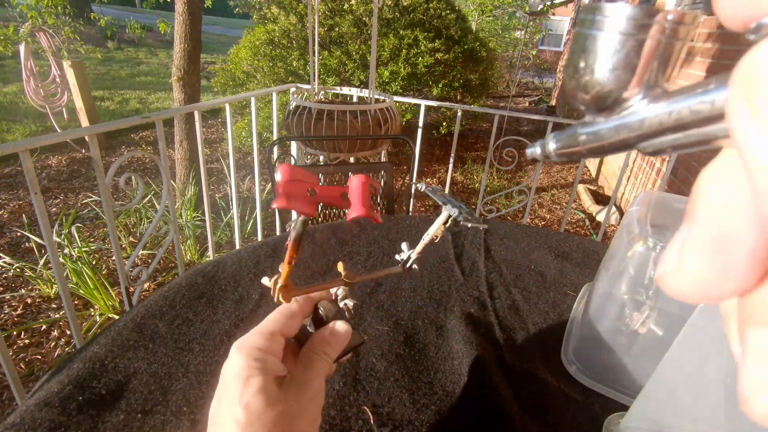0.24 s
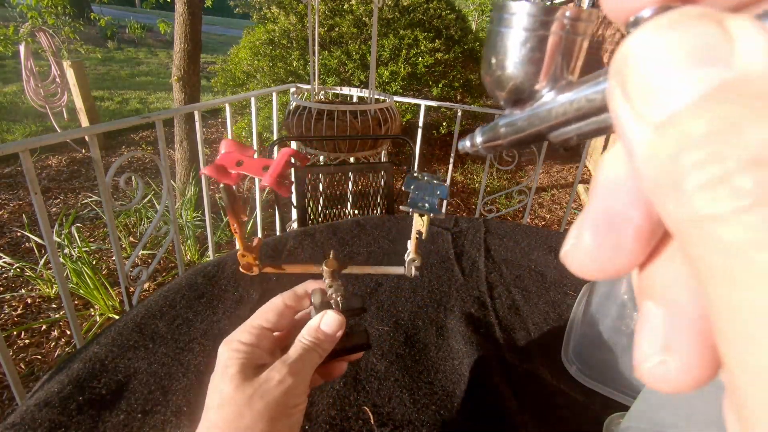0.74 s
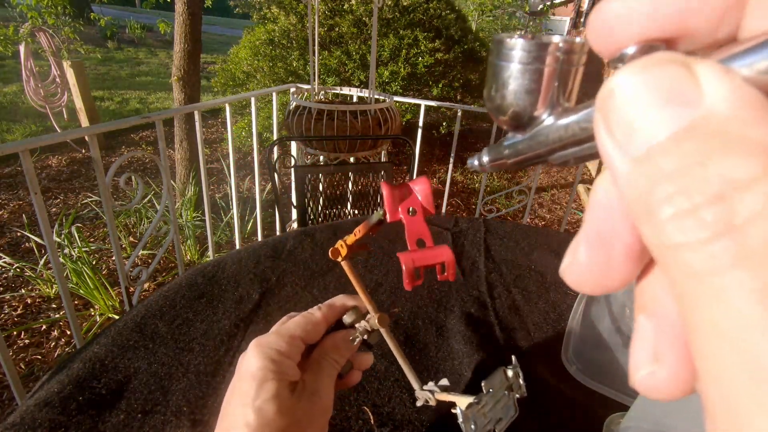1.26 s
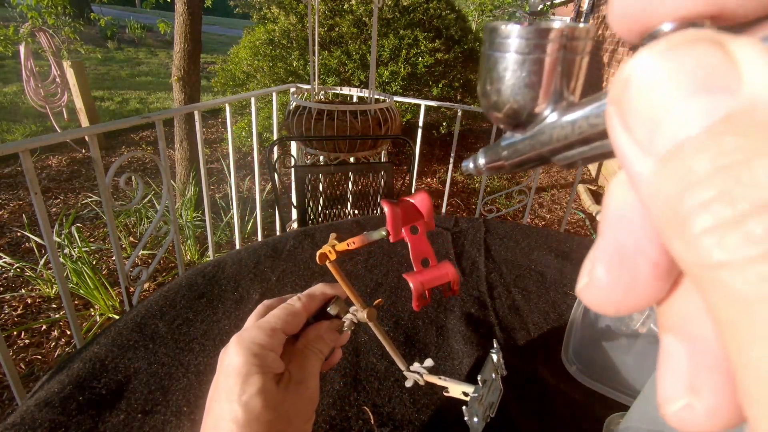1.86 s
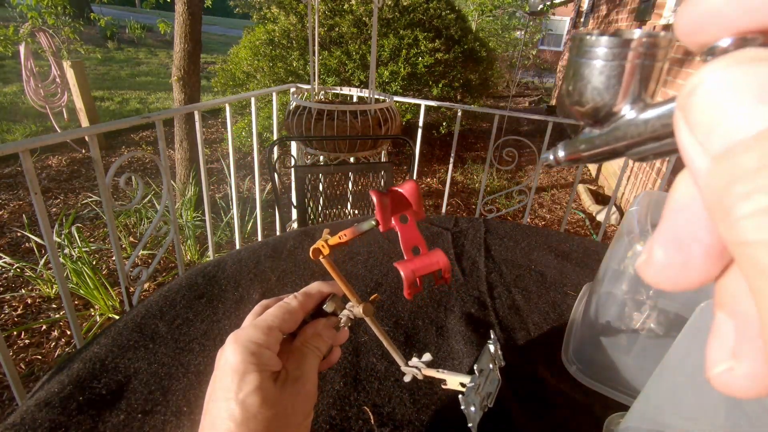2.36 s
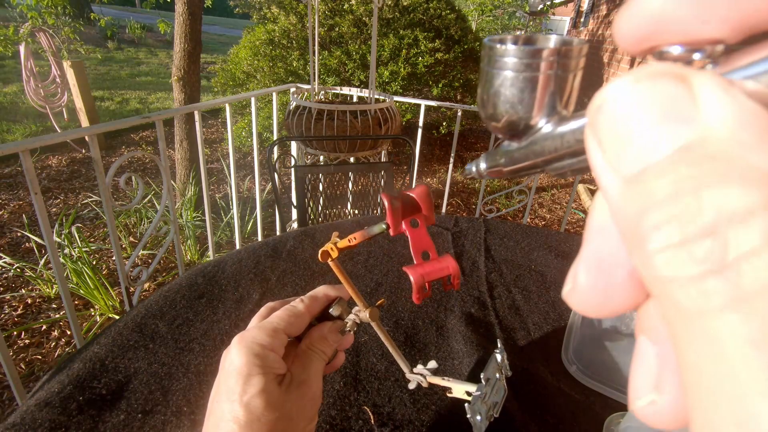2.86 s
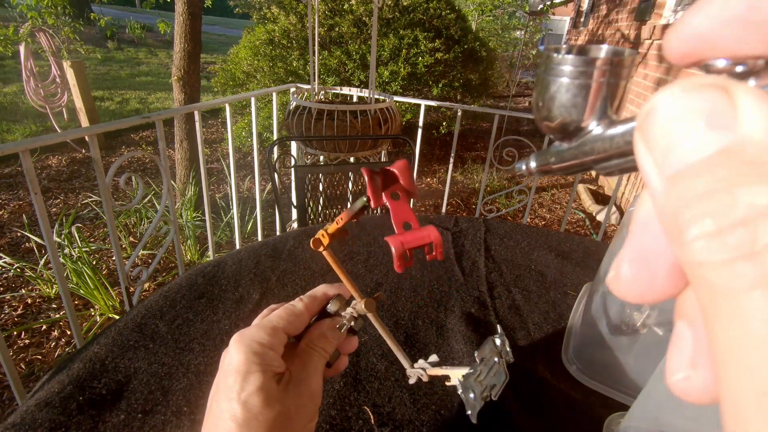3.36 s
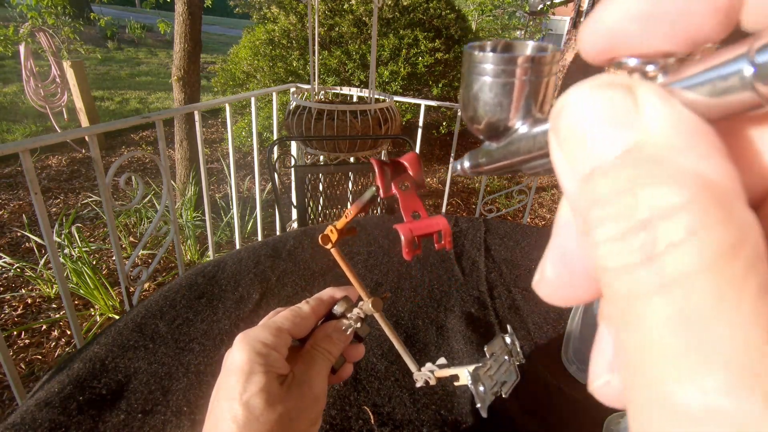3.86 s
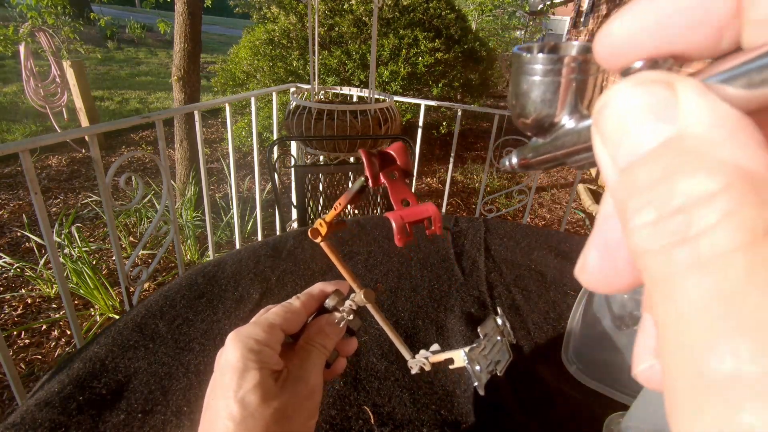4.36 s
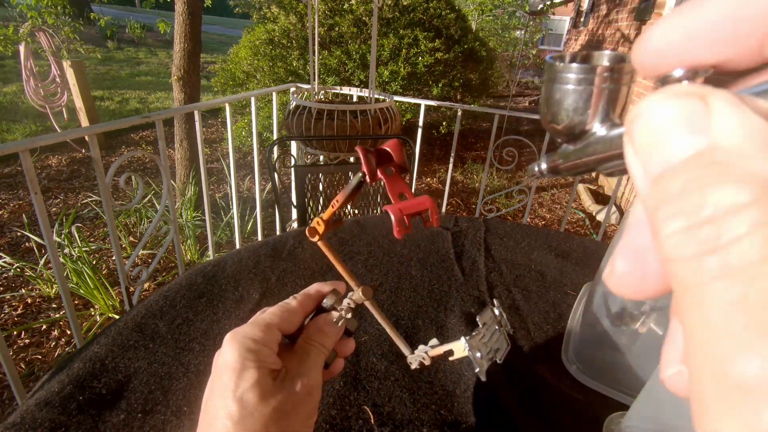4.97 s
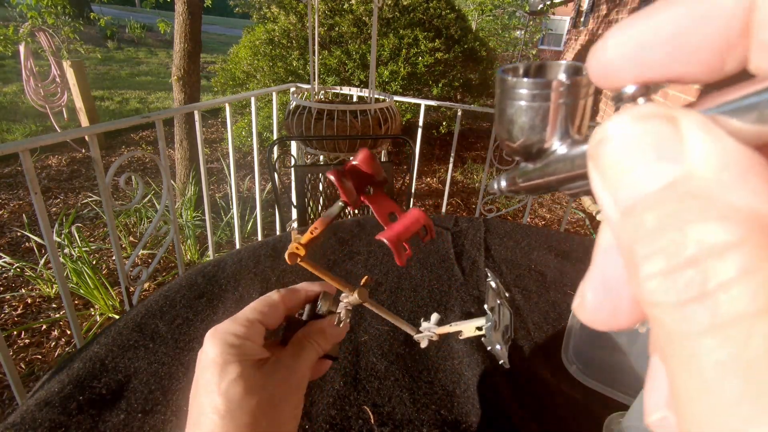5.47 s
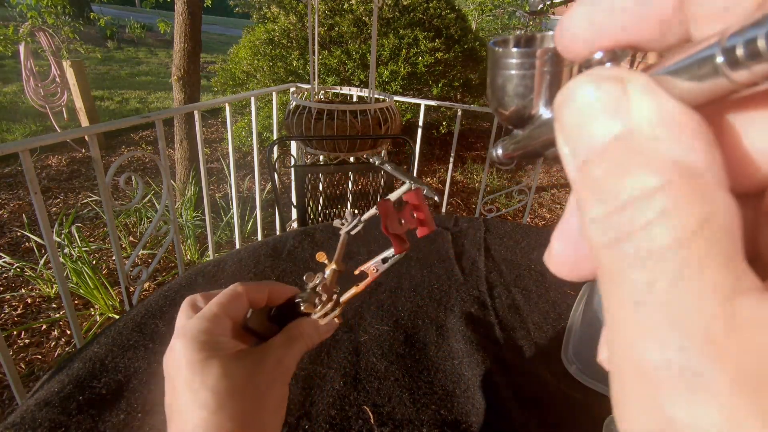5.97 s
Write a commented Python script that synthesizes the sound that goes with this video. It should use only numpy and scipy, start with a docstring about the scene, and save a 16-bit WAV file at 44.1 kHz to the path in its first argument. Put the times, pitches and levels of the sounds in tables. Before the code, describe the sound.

On an open porch, a small compressor putters in rapid low thuds, then cuts out with a soft puff of air. Light wind and faint traffic remain. A close airbrush starts hissing, the compressor restarts, and sprays follow in swelling bursts with a lower, sputtering roar, tiny whistles and dry trigger clicks. Finally the spray stops with a sharper click and the compressor puffs and coasts down. Close stereo microphone.

```python
"""An airbrush close to two microphone ports on a porch sprays in bursts: air hiss, then the lower roar of paint.
Hiss and roar are patchy shaped noise behind a valve; brief tones whistle and struck modes click at the trigger.
A piston compressor repeats a housing thump and valve knocks under a fan whirr. It cuts out with a puff of its
relief valve, starts again and cuts out once more. Wind, rumble, far traffic and a steady cricket are noise bands;
a bird is two gliding tones."""
import sys
import numpy as np
from scipy import signal
from scipy.fft import rfft, irfft, next_fast_len
from scipy.io import wavfile
from scipy.ndimage import uniform_filter1d, map_coordinates

SR = 44100
rng = np.random.default_rng(int(sys.argv[2]) if len(sys.argv) > 2 else 0)


def persist_wave(psi):
    """Save psi, clipped to +-1, as 16-bit WAV."""
    counts = np.round(np.clip(psi, -1, 1) * 32767).astype(np.int16)
    wavfile.write(sys.argv[1], SR, np.atleast_2d(counts).T)


N = 274302

# Levels in the tables are relative: later gains and the port response act on them.
# Compressor, steady pumping: [first t/s, last t/s, strokes]
STEADY_RUNS = [(-.009, .373, 11), (2.332, 2.785, 13), (2.823, 5.752, 78)]
# Compressor, single strokes while starting and coasting: [t/s, level/dB]
LOOSE_STROKES = [(.41, -26), (0.458, -8), (0.489, -18), (0.534, -21), (2.205, -10), (2.265, -13),
                 (2.293, -2.5), (5.788, -9.5), (5.825, -11), (5.872, -10), (5.919, -15)]
# Compressor, thump of the housing: [multiple of the stroke rate, level/dB]
HOUSING_SPECTRUM = [(1, -22.5), (2, -14.5), (3, 2), (4, -9.5), (5, -6), (6, 0), (7, -9.5), (8, -19),
                    (9, -14), (10, -19.5), (11, -27), (12, -20.5), (13, -38), (14, -32), (15, -32),
                    (16, -42)]
# Compressor, valve plates and rod: [t after stroke/s, f/Hz, level/dB, t60/s, left gain with right at 1]
VALVE_KNOCKS = [(.004, 672, -48, .18, -.4), (.012, 925, -55, .08, .3), (.016, 1550, -45, .035, .5),
                (.017, 1850, -45, .03, .5), (.001, 4250, -57.5, .05, .5), (.006, 4100, -60, .04, .5)]
# Compressor, motor fan and intake: [f/Hz, level/dB per Hz]
WHIRR_SPECTRUM = [(400, -34), (690, -6.5), (1000, -19), (1700, -8.5), (2300, -17.5), (3200, -23.5),
                  (4300, -19.5), (5200, -25.5), (6000, -21), (9000, -29), (14000, -36)]
# Wind on the ports: [t/s, level/dB]
WIND_LEVEL = [(0, -44), (.08, -20), (.45, -32), (.58, -28.5), (.645, -44), (.7, -33), (.87, -32.5),
              (.94, -30), (1.06, -23.5), (1.14, -47.5), (1.26, -22.5), (1.5, -39.5), (1.68, -32.5),
              (2.1, -46), (2.5, -28), (3.05, -40), (3.5, -29.5), (3.64, -37), (4.0, -27), (4.5, -35.5),
              (5.0, -29.5), (5.3, -32), (5.75, -28), (6.0, -41.5), (6.22, -37)]
# Wind on the ports: [f/Hz, level/dB per Hz]
WIND_SPECTRUM = [(15, -40), (39, -7), (48, 9), (54, 8.5), (65, -10.5), (100, -4), (200, -52), (500, -120)]
# Low rumble: [t/s, level/dB]
RUMBLE_LEVEL = [(0, -33), (.5, -41), (.65, -41.5), (.85, -38), (1.3, -38.5), (1.7, -40), (2.2, -39.5),
                (5.4, -35.5), (5.65, -30), (5.9, -36), (6.22, -46)]
# Low rumble: [f/Hz, level/dB per Hz]
RUMBLE_SPECTRUM = [(12, -3.5), (26, 2.5), (40, -9.5), (70, 0.5), (100, 0.5), (160, -5), (220, -15),
                   (340, -27), (520, -47), (800, -75.5), (1500, -120)]
# Low rumble: [f/Hz, left-right likeness]
RUMBLE_LIKENESS = [(40, 0.94), (130, 1), (300, -0.21), (600, 1)]
# Distant traffic: [t/s, level/dB]
TRAFFIC_LEVEL = [(0, -52.5), (1.7, -54.5), (5.8, -55.5), (6.22, -57.5)]
# Traffic and leaves: [f/Hz, level/dB per Hz]
TRAFFIC_SPECTRUM = [(150, -30), (320, -6.5), (600, -16.5), (900, -5.5), (1400, -7), (2200, -20),
                    (3200, -33.5), (5000, -32), (7000, -39.5), (9000, -36), (12000, -36.5), (15500, -46)]
# Traffic and compressor whirr: [f/Hz, left-right likeness]
DIFFUSE_LIKENESS = [(700, -0.83), (1400, -0.18), (3000, 0.32), (7000, -0.0083)]
# Cricket: [t/s, level/dB]
CRICKET_LEVEL = [(0, -85), (5.6, -85), (5.95, -79), (6.22, -79)]
# Relief valve, puffs: [t/s, level/dB]
RELIEF_PUFFS = [(0.354, -39), (5.7375, -40)]
# Relief valve, escaping air: [f/Hz, level/dB per Hz]
RELIEF_SPECTRUM = [(2500, -22), (4000, -17), (5200, 0), (6200, -3.5), (7300, 7.5), (9000, -7),
                   (14000, -15.5)]
# Bird, gliding notes: [t/s, length/s, start f/Hz, end f/Hz, level/dB]
BIRD_NOTES = [(.515, 0.05, 7100, 6800, -72), (.55, 0.04, 6850, 6040, -76)]
# Airbrush, air valve held down: [opens t/s, shuts t/s, hiss level/dB]
AIR_PRESSES = [(1.801, 2.447, -42), (2.631, 3.03, -41), (3.151, 3.54, -42), (3.638, 5.383, -42)]
# Airbrush, pulls on the needle: [fullest t/s, rise/s, fall/s, roar level/dB, lift of the hiss/dB]
NEEDLE_PULLS = [(2.29, 0.37, 0.21, -42.5, 10), (2.85, 0.18, 0.18, -43, 8), (3.39, .17, .14, -40, 8.5),
                (3.871, 0.18, 0.17, -42.5, 8.5), (4.25, 0.093, 0.15, -41.5, 5.5),
                (4.52, 0.08, 0.067, -42.5, 0), (4.64, 0.079, 0.065, -45, 8), (4.95, 0.12, 0.1, -45, 6.5),
                (5.23, .11, 0.21, -44.5, 5)]
# Airbrush, hiss of the air: [f/Hz, level/dB per Hz]
HISS_SPECTRUM = [(2000, -14.5), (3500, -3.5), (5000, -1), (7000, 5), (11000, 6), (16000, -1)]
# Airbrush, lower roar: [f/Hz, level/dB per Hz]
ROAR_SPECTRUM = [(350, -27.5), (700, 2), (1400, 8), (2500, -0.5), (4000, -8), (7000, -6.5), (12000, -21.5)]
# Airbrush, resonances of the air cap: [f/Hz, width/Hz, level/dB]
CAP_RESONANCES = [(4430, 370, 4), (6030, 57, 6), (6630, 210, 5), (9230, 400, 5), (10000, 1000, 6)]
# Airbrush nozzle at the two ports: [f/Hz, left-right likeness, phase lead of left/rad]
NOZZLE_AT_PORTS = [(700, 0.3, 1.3), (1100, 0.64, 1.0), (1550, 0.73, 1.1), (2800, 0.96, 0.0),
                   (4300, 0.78, 0.5), (5000, 0.41, 1.1), (5900, 0.56, 1.2), (6700, 0.48, 2.9),
                   (7700, 0.52, 4.1), (8500, 0.21, 4.9), (9700, 0.79, 6.1), (11000, 0.64, 6.6),
                   (12200, 0.14, 6.9), (15700, 0.35, 11.1)]
# Airbrush, paint whistling at the needle: [t/s, length/s, start f/Hz, end f/Hz, level/dB]
NEEDLE_WHISTLES = [(1.992, 0.021, 2480, 2460, -42), (2.14, 0.021, 7500, 7280, -21.5),
                   (2.70, 0.031, 2830, 2490, -45.5), (4.0, 0.0165, 2710, 2960, -44),
                   (4.175, 0.057, 2590, 3050, -46), (4.335, 0.022, 2800, 3070, -43.5),
                   (4.685, 0.025, 2660, 2850, -45), (5.015, 0.014, 2700, 2830, -44)]
# Airbrush, trigger contacts: [t/s, level/dB]
TRIGGER_CLICKS = [(2.4704, -36.5), (2.6289, -30.5), (3.0444, -47.5), (3.1492, -32.5), (3.6366, -34.5),
                  (5.4151, -25.5)]
# Airbrush, modes of the steel body: [f/Hz, level/dB, t60/s]
BODY_MODES = [(3850, -22, .006), (4670, 0, 0.023), (5920, 7, 0.016), (8400, -1, .005), (9700, -5, 0.028)]
# Colour of the two microphone ports: [f/Hz, left level/dB, right level/dB]
PORT_COLOUR = [(290, -0.5, 2.5), (810, 1, 3.5), (1018.5, -4.5, -4), (1700, -1, -1), (2600, 2.5, 2.5),
               (4040, 0, 2.5), (5020, -4, 3.5), (6080, -1, 8), (6610, -3.5, 7.5), (7400, 3, 3),
               (7900, -2.5, -2), (9260, -5, -11), (11420, -11, -6), (12200, -7.5, -13.5),
               (15700, -13.5, -8.5)]

STROKE_HZ = 26.3  # spacing of the housing harmonics
PORTS_ALIKE = .85  # how alike the wind is at the two ports
OPEN_DB_PER_S, SHUT_DB_PER_S = 1500, 896  # how fast the air comes and goes with the valve
AIR_ROAR_DB = -12.5  # roar of plain air, relative to its hiss
HISS_LAG_S = 0.013  # the hiss swells a little after the roar
ROAR_SHAPE, HISS_SHAPE = .9, 0.62  # power of the swell: small = square shoulders
TOP_HZ = 15850  # band limit of the ports


def amp(db):
    """Logarithmic level: dB to amplitude gain."""
    return 10 ** (np.asarray(db) / 20)


def unit(x):
    """Normalisation: x at rms 1."""
    return x / np.sqrt(np.mean(x ** 2) + 1e-20)


def along(points, hz):
    """Logarithmic frequency: the columns after f/Hz, interpolated on a log axis."""
    f, *columns = np.transpose(points)
    return np.squeeze([np.interp(np.log(hz + 1), np.log(f + 1), column) for column in columns])


def curve(rows):
    """Linear interpolation: the column after t/s, at every sample."""
    s, values = np.transpose(rows)
    return np.interp(np.arange(N) / SR, s, values)


def wobble(rate):
    """Slow random modulation: a smooth curve through rate random knots a second."""
    knots = rng.standard_normal(int(N * rate / SR) + 4)
    return map_coordinates(knots, [np.arange(N) * rate / SR])


def filtered(x, response, mirror="even"):
    """Linear filtering: the spectrum times a response, with x mirrored past both ends."""
    pad = SR // 2
    widths = [(0, 0)] * (x.ndim - 1) + [(pad, pad)]
    wide = np.pad(x, widths, mode="reflect", reflect_type=mirror)
    m = 2 * next_fast_len(wide.shape[-1] // 2 + 1)
    spectrum = rfft(wide, m) * response(np.fft.rfftfreq(m, 1 / SR))
    return irfft(spectrum, m)[..., pad:pad + x.shape[-1]]


def causal(db):
    """Minimum phase: the folded cepstrum gives a causal response with this gain."""
    cepstrum = irfft(np.log(amp(db)))
    cepstrum[1:len(db) - 1] *= 2
    cepstrum[len(db):] = 0
    return np.exp(rfft(cepstrum))


def paired(two, alike):
    """Interchannel coherence: a common and an opposed noise mixed to the likeness asked."""
    def mix(hz):
        turn = np.arccos(np.clip(alike(hz), -1, 1)) / 2
        return np.array([np.cos(turn), np.sin(turn)])
    mid, side = filtered(two, mix)
    return np.array([mid + side, mid - side])


def rush(spectrum, alike, patchy_db):
    """Turbulent noise: shaped stereo noise of rms 1 with patches of random gain in time and frequency."""
    z = signal.stft(rng.standard_normal((2, N + SR)), nperseg=512)[2]
    field = uniform_filter1d(rng.standard_normal(z.shape[1:]), size=6, axis=0)
    field = uniform_filter1d(field, size=10, axis=1)
    two = signal.istft(z * amp(patchy_db * unit(field)), nperseg=512)[1]
    shaped = filtered(two, lambda hz: amp(along(spectrum, hz)))
    return unit(paired(shaped, alike)[:, SR // 2:SR // 2 + N])


def glides(rows, rough):
    """Frequency modulation: short gliding tones with a soft swell and an unsteady pitch."""
    out = np.zeros(N)
    for s, length, from_hz, to_hz, db in rows:
        n = round(length * SR)
        jitter = uniform_filter1d(rng.standard_normal(n), size=40)
        pitch = np.linspace(from_hz, to_hz, n) * (1 + rough * jitter)
        tone = np.sin(2 * np.pi * np.cumsum(pitch) / SR)
        out[round(s * SR):][:n] += amp(db) * np.hanning(n) * tone
    return out


def compressor():
    """Periodic excitation: each stroke thumps the ringing housing and knocks the valves; the fan whirrs."""
    strokes = [(s, 0) for first, last, count in STEADY_RUNS for s in np.linspace(first, last, count)]
    lead_in = SR // 2  # samples ahead of t = 0
    kicks, knocks = np.zeros(N + SR), np.zeros((2, N + SR))
    t = np.arange(SR // 6) / SR
    for s, db in strokes + LOOSE_STROKES:
        kicks[round(s * SR) + lead_in] = amp(db + rng.normal(0, .5))
        for after, hz, level_db, t60, left in VALVE_KNOCKS:
            envelope = (1 - np.exp(-t / .0015)) * amp(-60 * t / t60)
            ring = envelope * np.sin(2 * np.pi * hz * rng.normal(1, .003) * t)
            size = amp(db + level_db + rng.normal(0, 1.5))
            start = round((s + after) * SR) + lead_in
            knocks[:, start:][:, :len(t)] += size * np.outer([left, 1], ring)
    shape = [(.2, -26)] + list(HOUSING_SPECTRUM) + [(30, -72), (100, -150)]
    shape_hz = [(k * STROKE_HZ, db) for k, db in shape]
    # the minus sign: pressure first drops, then peaks
    thump = filtered(kicks, lambda hz: -causal(along(shape_hz, hz)))
    thump = thump[lead_in + round(.007 * SR):][:N]
    turning = signal.fftconvolve(kicks, np.hanning(SR // 12))[lead_in + SR // 40:][:N]
    whirr = turning * rush(WHIRR_SPECTRUM, lambda hz: along(DIFFUSE_LIKENESS, hz), patchy_db=.7)
    return amp(-28.5) * unit(thump) + knocks[:, lead_in:lead_in + N] + amp([[-64], [-61]]) * whirr


def wind():
    """Flow noise at the ports: lumps of low-frequency noise, weaker on the left."""
    lumps = amp(curve(WIND_LEVEL) + 1.1 * wobble(9))
    buffet = rush(WIND_SPECTRUM, lambda hz: PORTS_ALIKE + 0 * hz, patchy_db=-0.16)
    return lumps * buffet * amp([[-1.5], [1.5]])


def rumble():
    """Low-passed noise: its random level swings make an uneven rumble."""
    level = amp(curve(RUMBLE_LEVEL) + 4.0 * wobble(9))
    return level * rush(RUMBLE_SPECTRUM, lambda hz: along(RUMBLE_LIKENESS, hz), patchy_db=0.64)


def traffic():
    """Diffuse field: far traffic and leaves as noise whose likeness varies with frequency."""
    level = amp(curve(TRAFFIC_LEVEL) + 0.36 * wobble(6))
    return level * rush(TRAFFIC_SPECTRUM, lambda hz: along(DIFFUSE_LIKENESS, hz), patchy_db=1.6)


def cricket():
    """Narrow-band noise: a steady song around 4.6 kHz that grows near the end."""
    band = [(4000, -90), (4500, 0), (4750, 0), (5300, -90)]  # f/Hz, level/dB per Hz
    return amp(curve(CRICKET_LEVEL)) * rush(band, lambda hz: .3 + 0 * hz, patchy_db=1.5)


def relief_valve():
    """Pressure release: a sudden puff of noise with a fast decay and a weak, slower porch answer."""
    t, shape = np.arange(N) / SR, np.zeros(N)
    for s, db in RELIEF_PUFFS:
        since = np.clip(t - s, 0, None)
        onset = 1 - np.exp(-since / 0.0015)
        decay = amp(-60 * since / 0.088) + amp(-20.5 - 60 * since / 0.37)
        shape += amp(db) * onset * decay
    return shape * rush(RELIEF_SPECTRUM, lambda hz: .3 + 0 * hz, patchy_db=.7)


def bird():
    """Frequency glide: two short falling notes."""
    return glides(BIRD_NOTES, rough=.1)


def swell(centre_s, rise_s, fall_s, power):
    """Cosine envelope: a rounded hump from 0 to 1 and back."""
    since = np.arange(N) / SR - centre_s
    phase = np.clip(np.where(since < 0, since / rise_s, since / fall_s), -1, 1)
    return np.abs(np.cos(np.pi / 2 * phase)) ** power


def flow():
    """Flow control: the valve gates the air; each pull of paint lifts the hiss and adds roar."""
    t = np.arange(N) / SR
    air, gate_sum = np.zeros(N), np.zeros(N)
    for opens, shuts, db in AIR_PRESSES:
        ramp_db = np.minimum(OPEN_DB_PER_S * (t - opens), SHUT_DB_PER_S * (shuts - t))
        gate = amp(np.minimum(0, ramp_db))
        air += amp(db) * gate
        gate_sum += gate
    lift_db, paint = np.zeros(N), np.zeros(N)
    for s, rise, fall, roar_db, hiss_db in NEEDLE_PULLS:
        lift_db += hiss_db * swell(s + HISS_LAG_S, rise, fall, HISS_SHAPE)
        paint += amp(roar_db) * swell(s, rise, fall, ROAR_SHAPE)
    roar_gain = np.hypot(air * amp(AIR_ROAR_DB), paint * gate_sum)
    return air * amp(lift_db), roar_gain


def air_cap(hz):
    """Resonance: peaks in dB that colour the nozzle's noise."""
    return amp(sum(db / (1 + (2 * (hz - centre) / width) ** 2) for centre, width, db in CAP_RESONANCES))


def porch(x, t60):
    """Reverberation: the short diffuse answer of wall and floor as decaying noise."""
    t = np.arange(SR // 4) / SR
    tail = rng.standard_normal((2, len(t))) * amp(-60 * t / t60) * (t > .003)
    return signal.fftconvolve(x, tail / np.linalg.norm(tail[0]), axes=1)[:, :N]


def airbrush():
    """Jet turbulence: the air jet hisses; paint in the stream adds a lower, sputtering roar."""
    hiss_gain, roar_gain = flow()
    alike = lambda hz: along(NOZZLE_AT_PORTS, hz)[0]
    eddies = wobble(400)  # turbulence makes all bands flutter together
    hiss_flutter = amp(0.73 * eddies + 0.65 * wobble(30))
    roar_flutter = amp(0.47 * eddies + 0.65 * wobble(60))
    hiss = hiss_gain * hiss_flutter * rush(HISS_SPECTRUM, alike, patchy_db=1.37)
    roar = roar_gain * roar_flutter * rush(ROAR_SPECTRUM, alike, patchy_db=1.5)
    nozzle = filtered(hiss + roar, air_cap) + whistles() + trigger()
    # the sound reaches the left port first: half of the lead on each side
    lead = lambda hz: np.exp(.5j * np.outer([1, -1], along(NOZZLE_AT_PORTS, hz)[1]))
    direct = filtered(nozzle, lead)
    return direct + amp(-16) * porch(direct, t60=.15)


def whistles():
    """Frequency glide: paint whistles briefly at the needle, with a rough pitch."""
    return glides(NEEDLE_WHISTLES, rough=0.38)


def trigger():
    """Impact and modal ringing: each lever contact is a dry crack and a brief ring of the steel body."""
    out, t = np.zeros(N), np.arange(SR // 20) / SR
    for s, db in TRIGGER_CLICKS:
        ring = sum(amp(level - 60 * t / t60) * np.sin(2 * np.pi * hz * t) for hz, level, t60 in BODY_MODES)
        crack = amp(-60 * t / .008) * rng.choice([-1, 1], len(t))
        out[round(s * SR):][:len(t)] += amp(db) * (amp(-16) * ring + crack)
    return filtered(out, lambda hz: hz ** 2 / (hz ** 2 + 2000 ** 2))  # thins out the lows


def scene():
    """Superposition: all sources add at the two ports."""
    outdoors = wind() + rumble() + traffic() + cricket() + bird()
    return compressor() + outdoors + relief_valve() + airbrush()


def record(dry):
    """Frequency response: each port has its own colour; nothing is kept above the band limit."""
    return filtered(dry, lambda hz: amp(along(PORT_COLOUR, hz)) * (hz < TOP_HZ), mirror="odd")


dry = scene()
out = record(dry)
persist_wave(out)
```